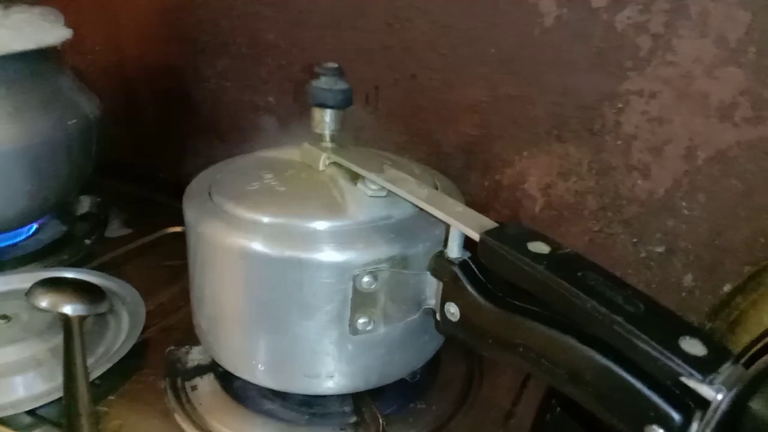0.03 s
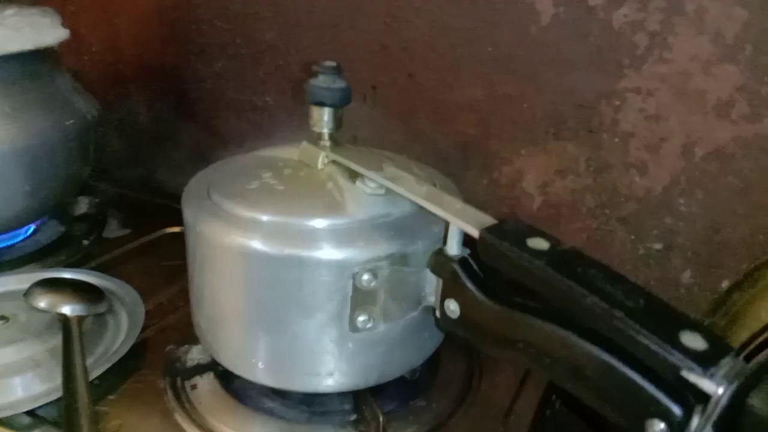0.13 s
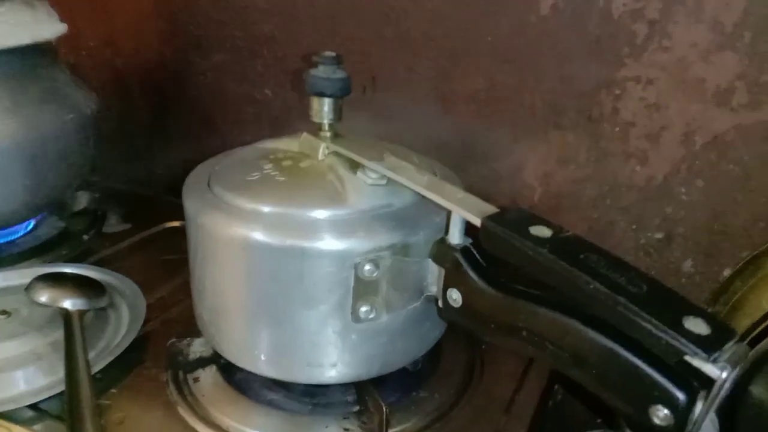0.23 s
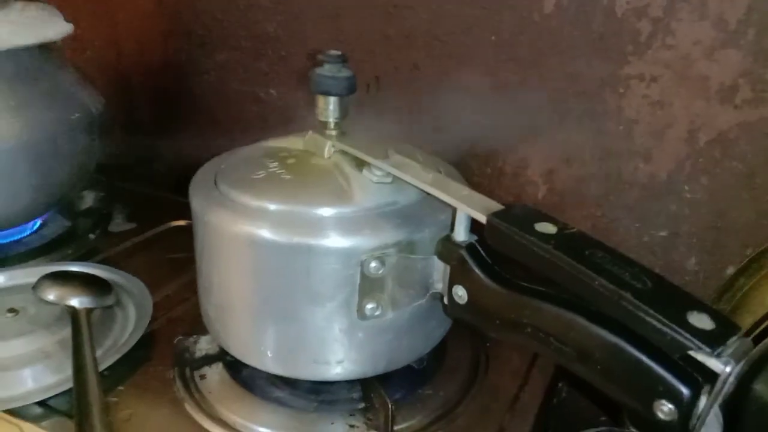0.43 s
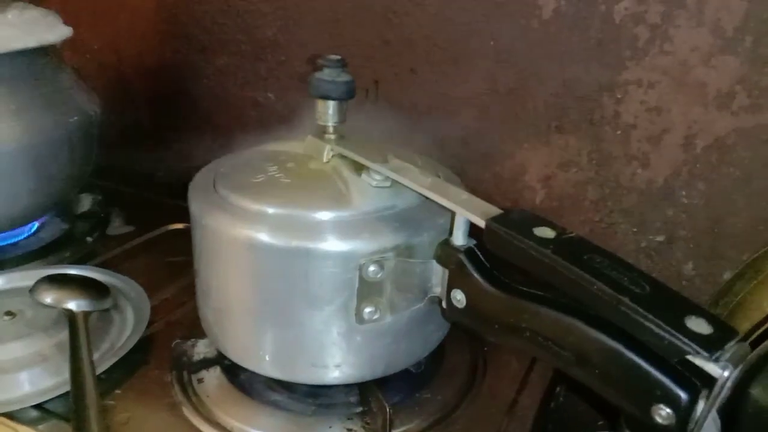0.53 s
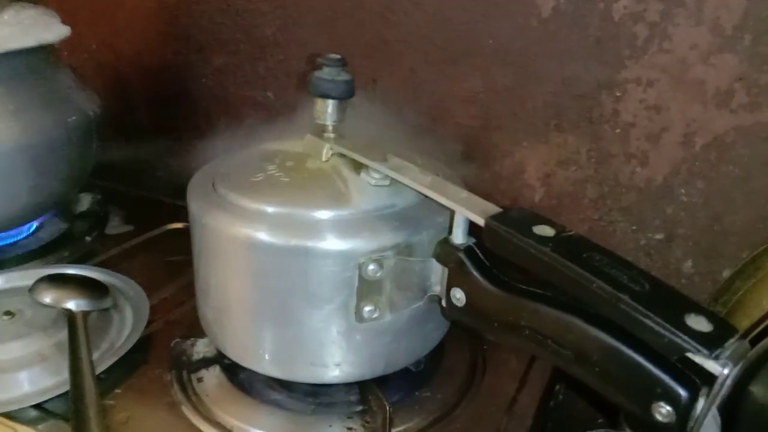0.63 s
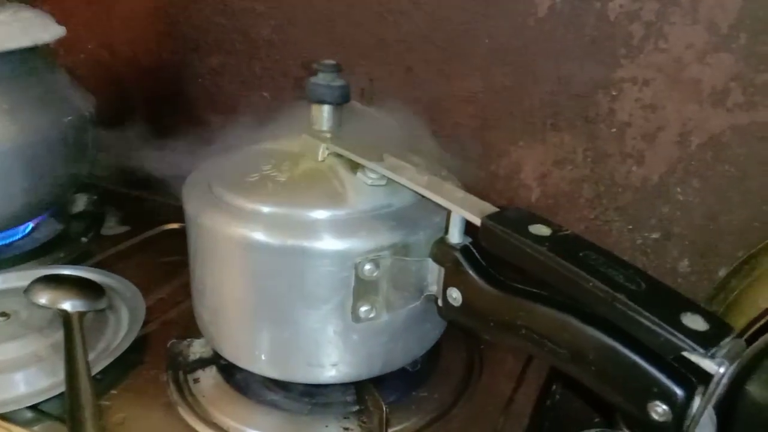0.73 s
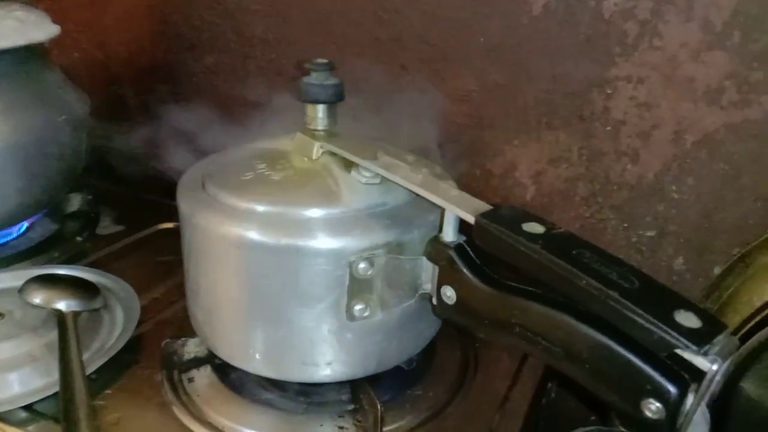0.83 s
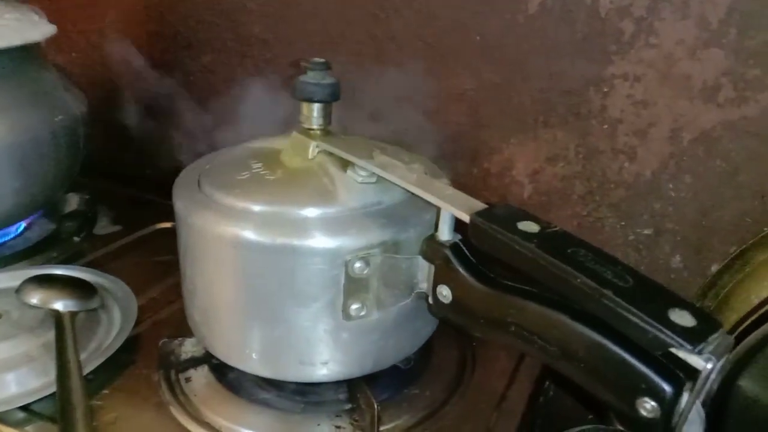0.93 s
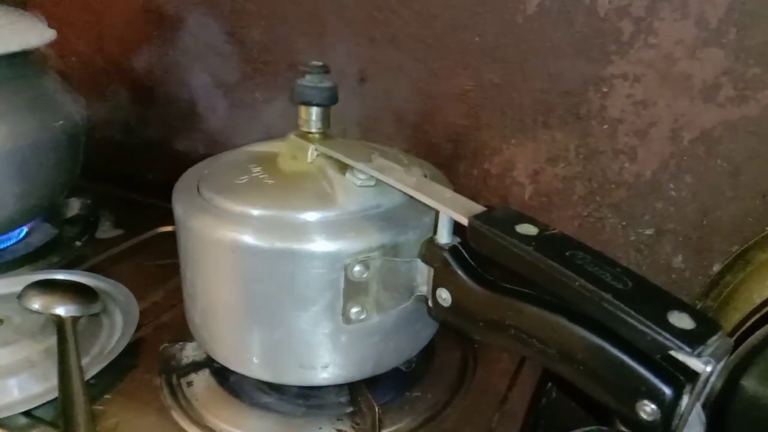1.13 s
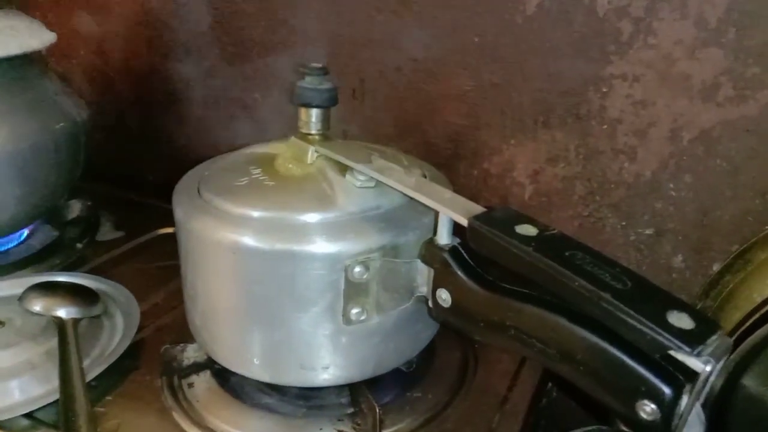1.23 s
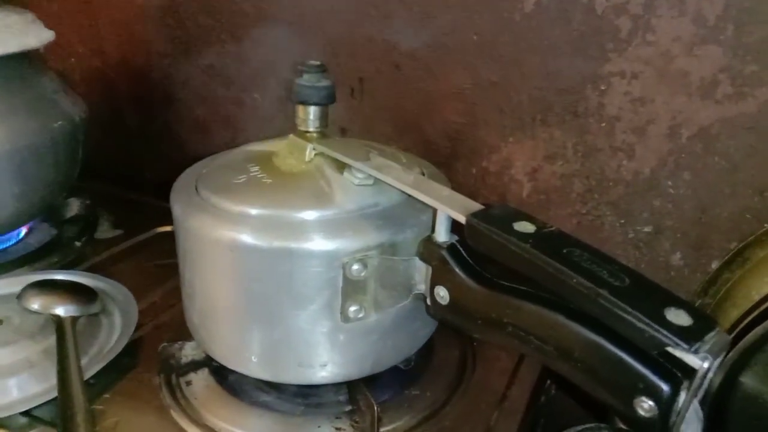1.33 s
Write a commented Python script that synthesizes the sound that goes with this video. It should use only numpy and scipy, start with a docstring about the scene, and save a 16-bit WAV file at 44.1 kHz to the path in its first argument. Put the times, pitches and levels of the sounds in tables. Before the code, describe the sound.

Pressure cooker steam venting, close and mono in a small kitchen. Silence until about 0.12 s, then a harsh, bright hiss swells to full by 0.4 s. From 0.6 s it dulls and weakens, with a wavering thin whistle near 1.2 kHz flickering in and a faint low hum around 0.75 s. After 1.0 s it collapses to a thin steady leak over faint pot ringing and burner rumble until 1.4 s.

```python
"""Pressure cooker venting steam

Steam blows off from the weighted vent of a pressure cooker on a gas stove, close up and in mono. Bands of
shaped noise make the jet, which roars, dulls as the weight sinks, then dies to a thin steady leak.
The vent tube sings a wavering sine, noise through resonances rings in the pot, low noise rumbles as the
burner, and a brief low hum is stacked from late-starting sines. It all fades in from silence."""
import sys
import numpy as np
from scipy import signal
from scipy.fft import rfft, irfft, next_fast_len
from scipy.io import wavfile
from scipy.ndimage import uniform_filter1d, map_coordinates

SR = 44100
rng = np.random.default_rng(int(sys.argv[2]) if len(sys.argv) > 2 else 0)


def to_wav(sig):
    """Store sig (one row per channel, or 1-D mono) as 16-bit WAV at the path in sys.argv[1].

    Samples outside -1..1 are clipped; the rate is SR.
    """
    pcm = np.clip(np.atleast_2d(sig), -1, 1) * 32767
    pcm = np.round(pcm).astype(np.int16)
    wavfile.write(sys.argv[1], SR, pcm.T)  # frames by channels


N = 61739
TIME_S = np.arange(N) / SR


def amp(db):
    """Decibels to linear gain."""
    return 10 ** (np.asarray(db) / 20)


def unit(x):
    """Scale to an rms of 1."""
    return x / np.sqrt(np.mean(x ** 2) + 1e-20)


def along(points, hz):
    """Read (Hz, dB) points on a log axis: -120 dB below the first, the last level held above."""
    point_hz, point_db = np.transpose(points)
    return np.interp(np.log(hz + 1), np.log(point_hz + 1), point_db, left=-120)


def curves(rows):
    """One value per sample for each column after the time."""
    start_s, *columns = np.transpose(rows)
    return [np.interp(TIME_S, start_s, column) for column in columns]


def wobble(rate):
    """A smooth random curve through `rate` knots a second."""
    knots = rng.standard_normal(N // 20)
    return map_coordinates(knots, [TIME_S * rate])


def filtered(x, response):
    """Multiply the spectrum of x by a response of frequency, padded against wrap-around."""
    size = next_fast_len(N + SR // 2)
    spectrum = rfft(x, size) * response(np.fft.rfftfreq(size, 1 / SR))
    return irfft(spectrum, size)[..., :N]


def rush(spectrum, patchy_db):
    """Coloured noise of rms 1, with time-frequency patches of random gain."""
    bins = signal.stft(rng.standard_normal(N), nperseg=512)[2]
    patches = uniform_filter1d(rng.standard_normal(bins.shape), size=5, axis=0)  # across frequency
    patches = uniform_filter1d(patches, size=8, axis=1)  # across time
    noise = signal.istft(bins * amp(patchy_db * unit(patches)), nperseg=512)[1][:N]
    return unit(filtered(noise, lambda hz: amp(along(spectrum, hz))))


# Jet as the weight sinks: start_s [s], level_db [dB], then treble_db, middle_db, air_db [dB over the main band]
JET_COURSE = [(.2, -17, -3, -7.5, -14), (.3, -16, -6, -10.5, -14), (.43, -16, -5.5, -11.5, -20),
              (.5, -16.5, -3.5, -9.5, -15), (.57, -15, -6.5, -9.5, -17), (.64, -17, -9, -7.5, -24),
              (.69, -19, -12.5, -5.5, -22), (.745, -22.5, -15.5, -3.5, -25), (.84, -23.5, -12, -4, -22),
              (.905, -23.5, -14.5, -5.5, -21), (.97, -29.5, -14.5, -1.5, -26),
              (1.01, -34.5, -16, -6.5, -34), (1.05, -39, -17, -5, -30)]
# Colours of the jet's four noise bands: freq_hz [Hz], level_db [relative dB per Hz]
JET_MAIN_COLOUR = [(2530, -17.5), (4300, -12.5), (4420, -17.5), (5290, -3), (5600, -2.5), (6260, -7),
                   (7160, -11.5), (7600, -20), (8200, -25), (10700, -24.5), (18000, -120)]
JET_TREBLE_COLOUR = [(4650, -31), (7900, -8.5), (8170, -12.5), (9300, -3), (10700, 1), (13400, -12.5)]
JET_MIDDLE_COLOUR = [(590, -22), (1000, -21), (1120, -15), (1240, -11.5), (1350, -9.5), (1780, -8),
                     (2830, -2), (4370, -9.5), (4600, -5), (5980, -27), (10100, -120)]
JET_AIR_COLOUR = [(7650, -22), (13000, -7), (13800, -7), (14400, -3), (14900, 6), (15700, -16)]
SPUTTER_DB, SPUTTER_PER_S = 1, 250  # fast unevenness of the flow, shared by all four bands
DYING_DB_PER_S = 153  # extra fall after the last row of the jet's course


def jet():
    """Turbulent steam as four noise bands; treble and air lose more level than the main band."""
    level_db, treble_db, middle_db, air_db = curves(JET_COURSE)
    level_db = level_db - DYING_DB_PER_S * np.maximum(TIME_S - JET_COURSE[-1][0], 0)
    bands = rush(JET_MAIN_COLOUR, patchy_db=0.0)
    bands = bands + amp(treble_db) * rush(JET_TREBLE_COLOUR, patchy_db=1.0)
    bands = bands + amp(middle_db) * rush(JET_MIDDLE_COLOUR, patchy_db=1.5)
    bands = bands + amp(air_db) * rush(JET_AIR_COLOUR, patchy_db=-2.0)
    sputter_db = SPUTTER_DB * wobble(SPUTTER_PER_S)
    slow_sway_db = 0.86 * wobble(24.13)
    return amp(level_db + sputter_db + slow_sway_db) * bands


# Colour of the weak leak under the seated weight: freq_hz [Hz], level_db [relative dB per Hz]
LEAK_COLOUR = [(650, -54), (1100, -23), (1300, -7.5), (1600, -14), (2400, -10.5), (3500, -16), (4400, -19),
               (5100, -13), (5600, -4), (6300, -13), (7100, -15), (7900, -31), (9200, -23.5), (10800, -19),
               (12000, -23.5), (13800, -34), (15000, -25), (15700, -35)]
LEAK_DB = -46


def leak():
    """A thin, nearly steady hiss beneath the jet, left bare when the jet has gone."""
    return amp(LEAK_DB + 0.56 * wobble(14.1)) * rush(LEAK_COLOUR, patchy_db=1.0)


# Loudness of the low roar: start_s [s], level_db [dB]
ROAR_LEVEL = [(0.14, -51), (0.188, -41.5), (0.22, -49), (0.29, -45), (0.62, -47), (0.63, -58), (0.664, -45),
              (0.874, -36.5), (0.976, -50), (1.11, -46.5), (1.128, -53.5), (1.33, -46.5), (1.362, -57.5),
              (1.4, -48)]
# Colour of the low steam before the pot: freq_hz [Hz], level_db [relative dB per Hz]
ROAR_COLOUR = [(94, -70), (160, -24.5), (217, -9.5), (270, -13), (444, -12.5), (553, -17), (1080, -11),
               (1200, -8), (1560, -17), (2640, -120)]
# Resonances of the pot: centre_hz [Hz], width_hz [Hz, full width at half height],
# added_db [dB, peak of the ring relative to the direct sound]
POT_RESONANCES = [(297, 13.6, 1), (609, 10.5, -1.5), (836, 28, 3.5), (990, 9.1, 7)]


def pot(hz):
    """Response of the pot: direct sound plus a bell-shaped peak at each resonance."""
    response = 1
    for centre_hz, width_hz, added_db in POT_RESONANCES:
        bell = width_hz ** 2 / (width_hz ** 2 + 4 * (hz - centre_hz) ** 2)
        response = response + amp(added_db) * bell
    return response


def roar():
    """The low end of the steam, ringing in the pot's resonances."""
    ringing = unit(filtered(rush(ROAR_COLOUR, patchy_db=3.0), pot))
    return amp(curves(ROAR_LEVEL)[0]) * ringing


# Loudness of the singing vent: start_s [s], level_db [dB]
TONE_LEVEL = [(0.14, -30), (0.15, -30.5), (0.296, -76), (0.318, -65), (0.364, -67), (0.416, -74),
              (0.5, -68), (0.566, -63), (0.598, -35.5), (0.706, -43.5), (0.728, -52), (0.85, -30),
              (0.872, -61), (0.896, -34), (1.116, -62.5), (1.138, -46), (1.19, -85), (1.236, -41.5),
              (1.39, -75), (1.4, -57)]
TONE_HZ, TONE_RISE_HZ, TONE_RISE_S = 1227.4, 27.46, 0.86  # the pitch steps up as the flow dies
TONE_WANDER, TONE_FLUTTER_DB = 0.0103, 3.5  # pitch wander as a fraction, level flutter in dB


def vent_tone():
    """The vent tube sings: one sine made fuzzy by random pitch wander and level flutter."""
    pitch_hz = TONE_HZ + TONE_RISE_HZ / (1 + np.exp((TONE_RISE_S - TIME_S) / .04))
    pitch_hz = pitch_hz * (1 + TONE_WANDER * wobble(69.96))
    phase = 2 * np.pi * np.cumsum(pitch_hz) / SR
    level_db = curves(TONE_LEVEL)[0] + TONE_FLUTTER_DB * wobble(59.7)
    return amp(level_db) * np.sqrt(2) * np.sin(phase)


# Loudness of the burner: start_s [s], level_db [dB]
FLAME_LEVEL = [(0.2, -59), (0.332, -57), (0.346, -60), (0.686, -54.5), (0.712, -66), (0.84, -47),
               (0.916, -58), (1.4, -57.5)]
# Colour of the burner rumble: freq_hz [Hz], level_db [relative dB per Hz]
FLAME_COLOUR = [(15, -49), (25, -28), (43, -25), (75, -1), (91, -8), (103, 7.5), (170, 2.5), (220, -18),
                (370, -120)]


def burner():
    """The gas flame's low rumble, as patchy low noise."""
    return amp(curves(FLAME_LEVEL)[0]) * rush(FLAME_COLOUR, patchy_db=3.5)


# Partials of the hum: multiple [of the hum pitch], level_db [dB over the hum level], late_s [s]
HUM_STACK = [(1, -1, 0.018), (2, -3.5, 0.062), (3, -14.5, 0.035)]
HUM_S, HUM_RISE_S, HUM_HOLD_S, HUM_FALL_S = 0.71, 0.018, 0.065, 0.027
HUM_HZ, HUM_DB = 223, -43


def hum():
    """A brief low hum: harmonic sines share one wavering pitch, overtones later than the fundamental."""
    knees_s = HUM_S + np.cumsum([0, HUM_RISE_S, HUM_HOLD_S, HUM_FALL_S])
    phase = 2 * np.pi * np.cumsum(HUM_HZ * (1 + 0.0064 * wobble(32.3))) / SR
    total = np.zeros(N)
    for multiple, level_db, late_s in HUM_STACK:
        swell = np.interp(TIME_S - late_s, knees_s, [0, 1, 1, 0])
        gain = amp(HUM_DB + level_db + 2.8 * wobble(30.7))
        total += gain * swell * np.sin(multiple * phase)
    return total


KITCHEN_T60_S, KITCHEN_DB = 0.22, -6.5  # decay time, reverberation relative to direct


def kitchen(x):
    """Direct sound plus a decaying noise tail for walls and pans, scaled to about the same energy."""
    tail_s = np.arange(SR // 2) / SR
    tail = rng.standard_normal(len(tail_s)) * amp(-60 * tail_s / KITCHEN_T60_S)
    wet = signal.fftconvolve(x, tail / np.linalg.norm(tail))[:N]
    return (x + amp(KITCHEN_DB) * wet) / np.hypot(1, amp(KITCHEN_DB))


def scene():
    """Steam in the kitchen, with tone, burner and hum dry; the same signal in both channels."""
    steam = kitchen(jet() + leak() + roar())
    mono = steam + vent_tone() + burner() + hum()
    return np.tile(mono, (2, 1))


FADE_START_S, FADE_EDGE_S, FADE_S, FADE_POWER = .121, .02, .27, .9
TOP_HZ = 15610  # nothing passes above this


def record(dry):
    """Fade in from silence with a soft edge, then limit the band with a 120 Hz wide slope."""
    since_s = TIME_S - FADE_START_S
    fade = np.clip(since_s / FADE_S, 0, 1) ** FADE_POWER
    soft_edge = np.clip(since_s / FADE_EDGE_S, 0, 1)
    return filtered(dry * fade * soft_edge, lambda hz: np.clip((TOP_HZ - hz) / 120, 0, 1) ** 2)


dry = scene()
out = record(dry)
to_wav(out)
```